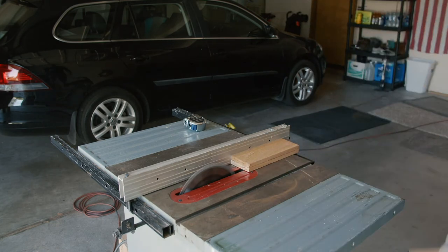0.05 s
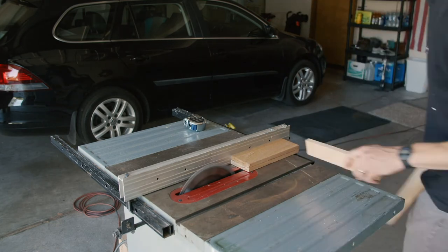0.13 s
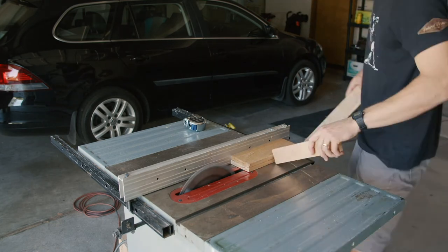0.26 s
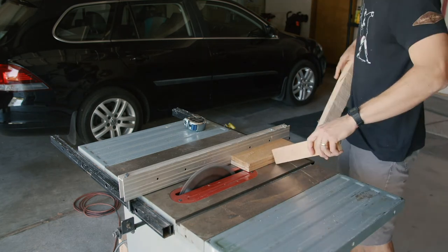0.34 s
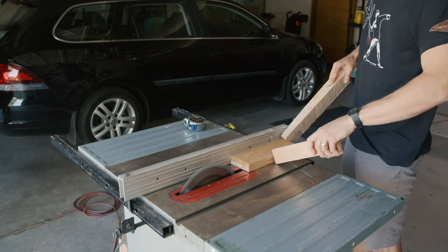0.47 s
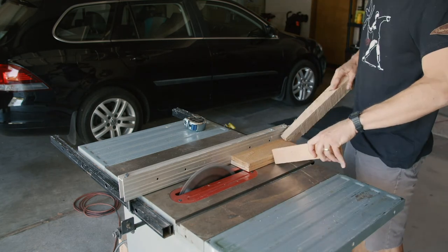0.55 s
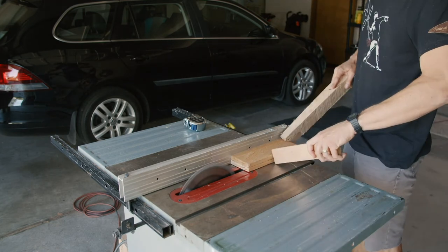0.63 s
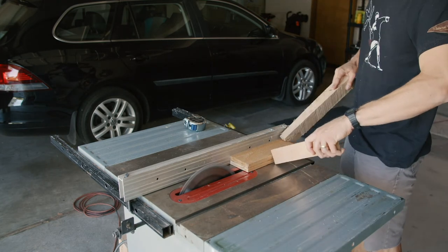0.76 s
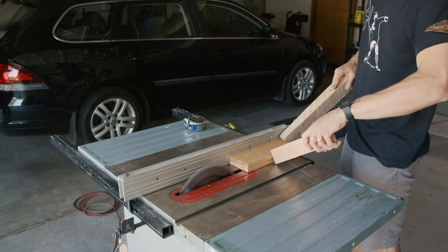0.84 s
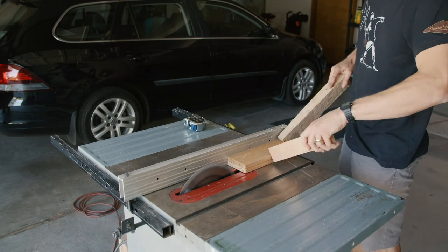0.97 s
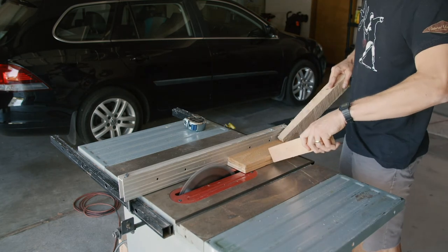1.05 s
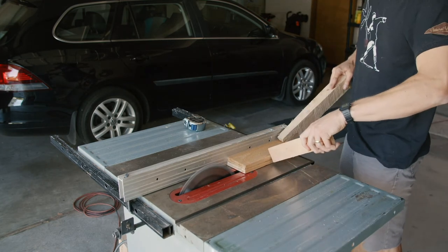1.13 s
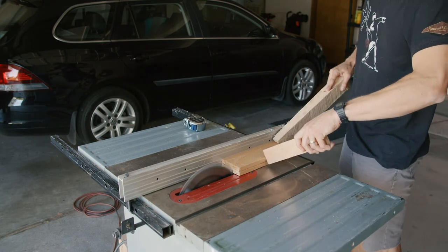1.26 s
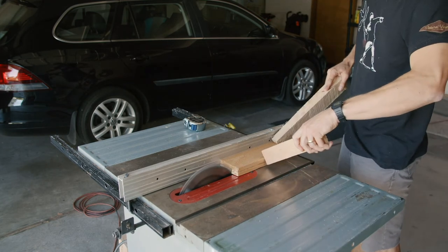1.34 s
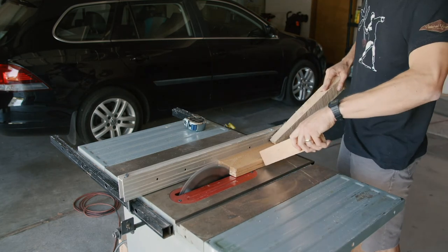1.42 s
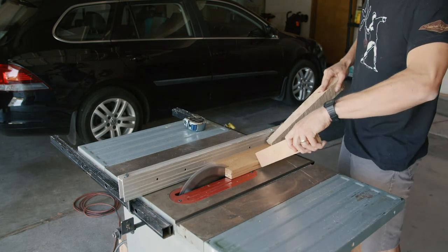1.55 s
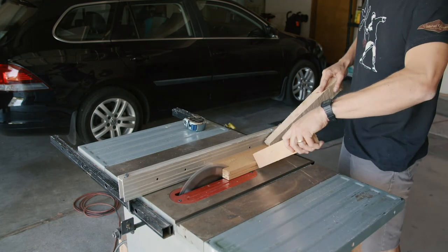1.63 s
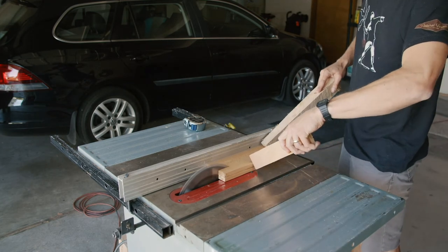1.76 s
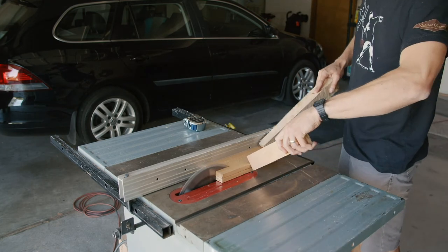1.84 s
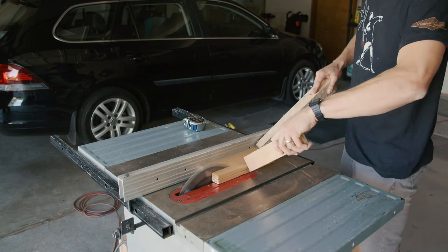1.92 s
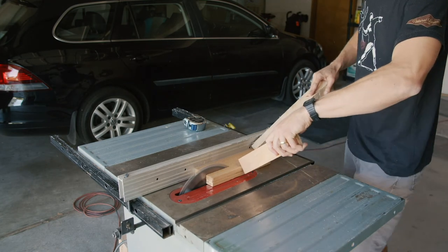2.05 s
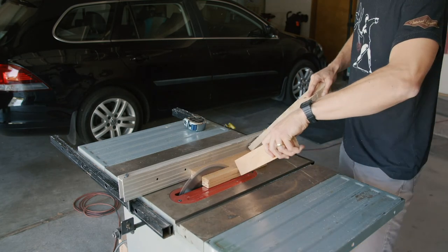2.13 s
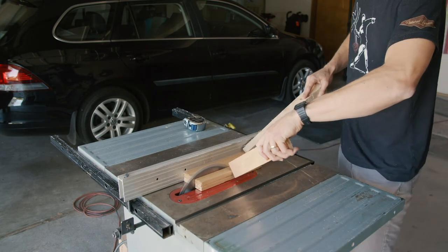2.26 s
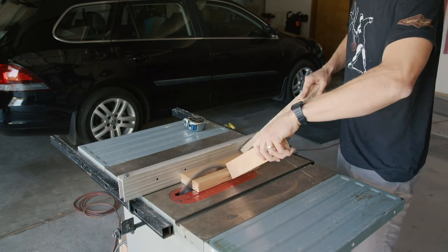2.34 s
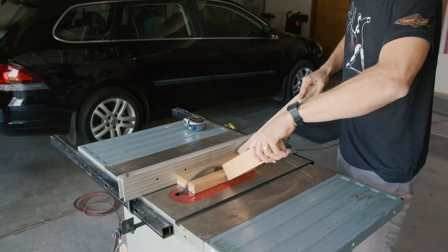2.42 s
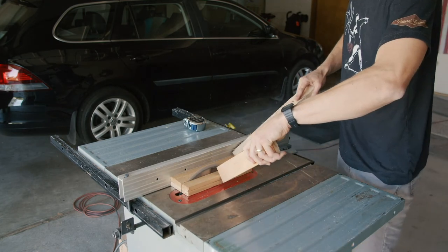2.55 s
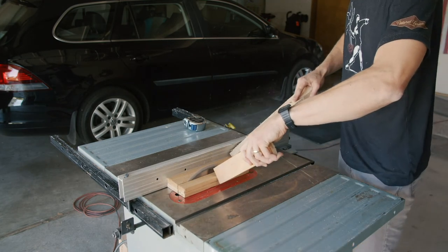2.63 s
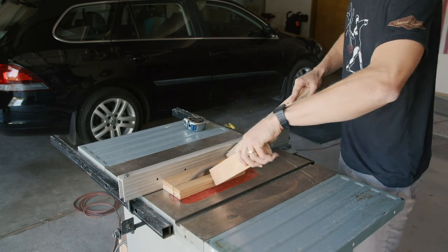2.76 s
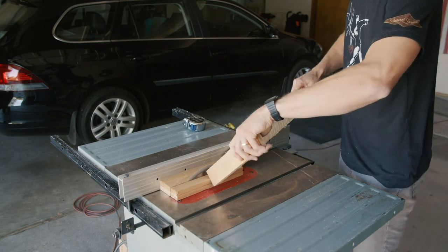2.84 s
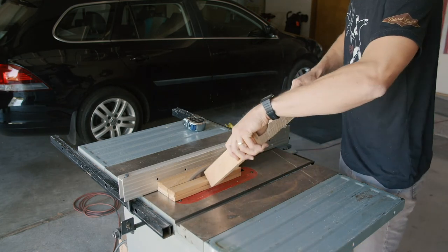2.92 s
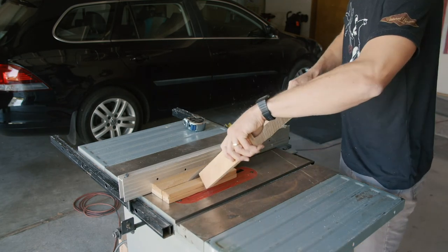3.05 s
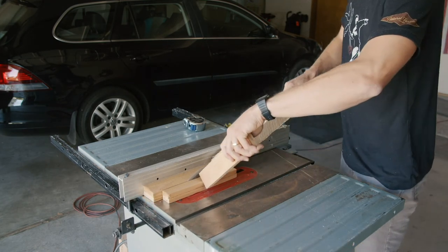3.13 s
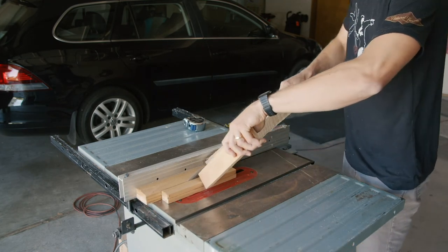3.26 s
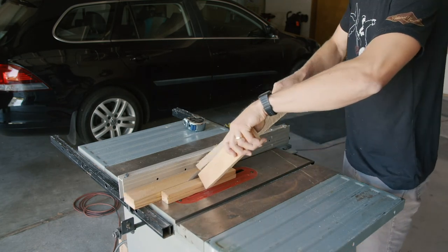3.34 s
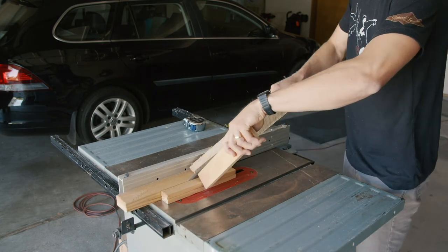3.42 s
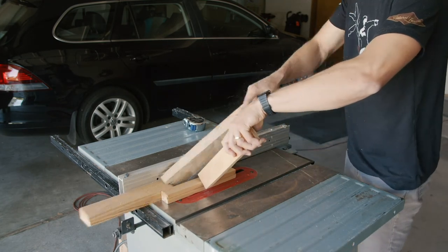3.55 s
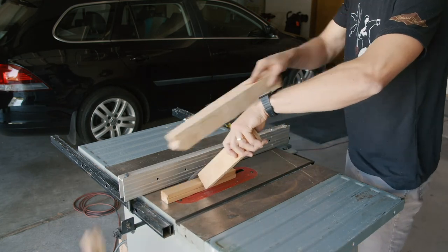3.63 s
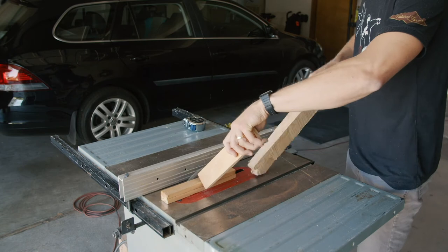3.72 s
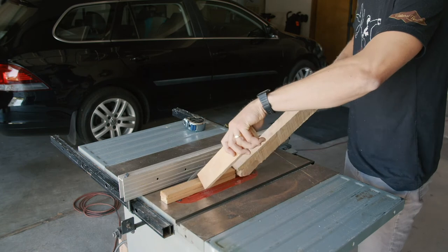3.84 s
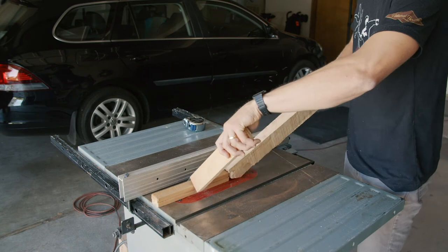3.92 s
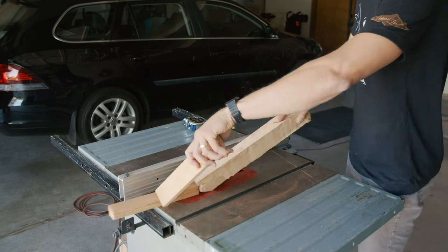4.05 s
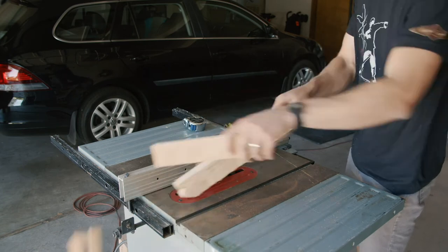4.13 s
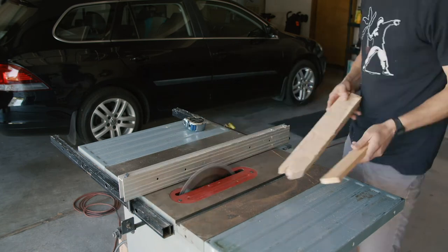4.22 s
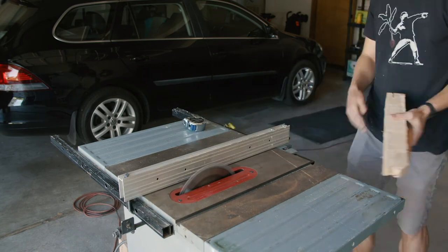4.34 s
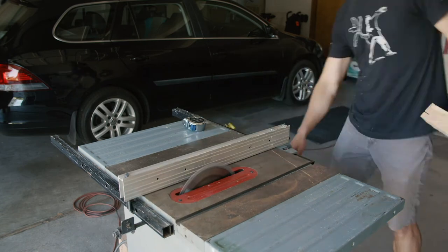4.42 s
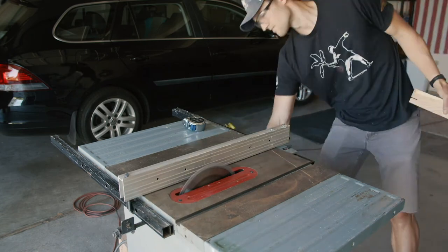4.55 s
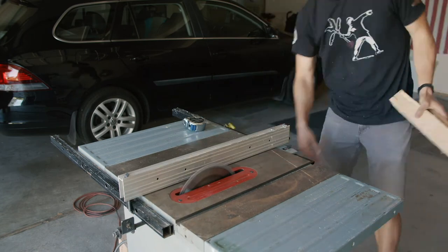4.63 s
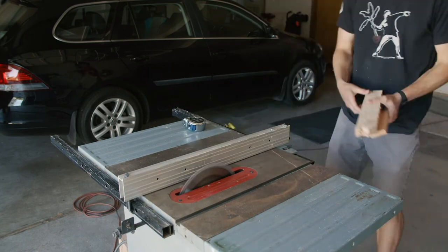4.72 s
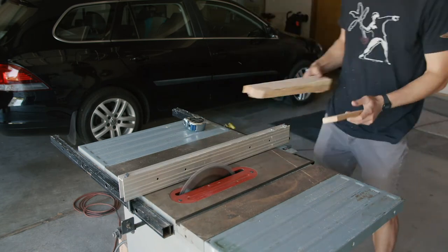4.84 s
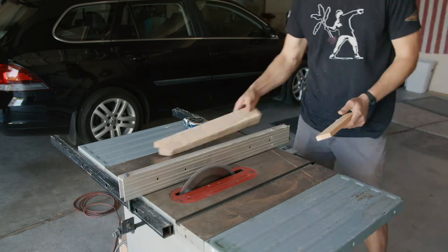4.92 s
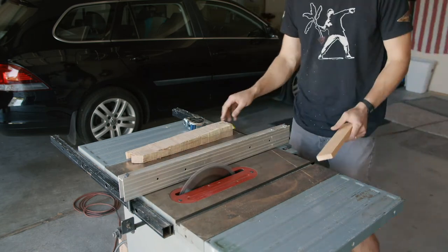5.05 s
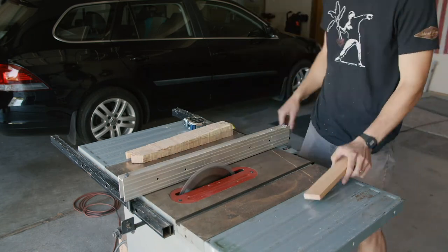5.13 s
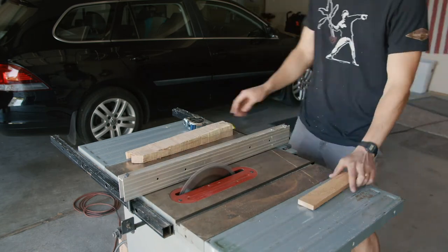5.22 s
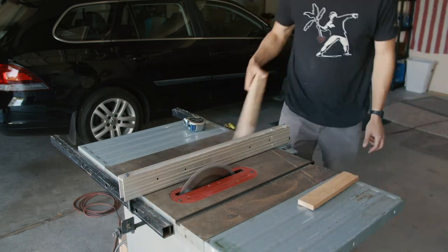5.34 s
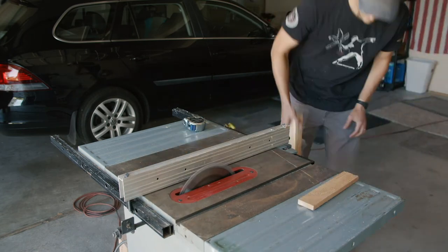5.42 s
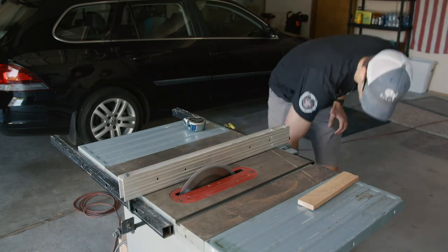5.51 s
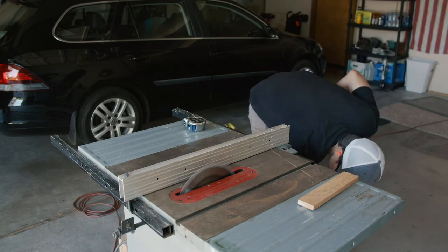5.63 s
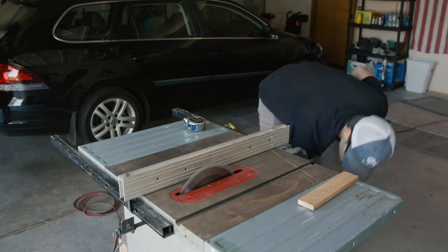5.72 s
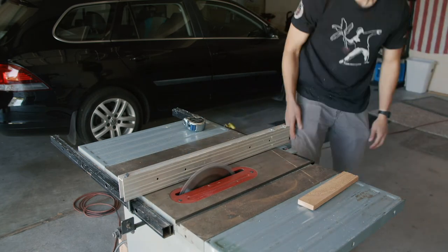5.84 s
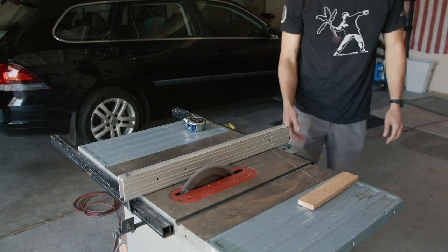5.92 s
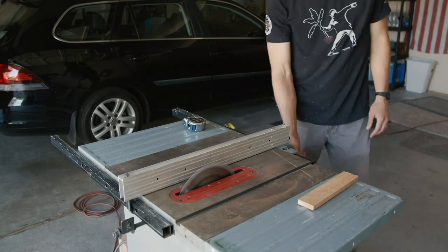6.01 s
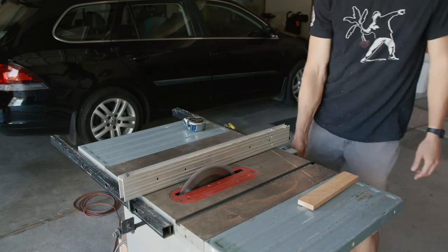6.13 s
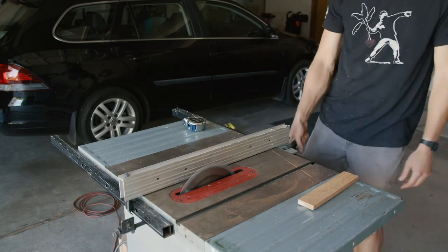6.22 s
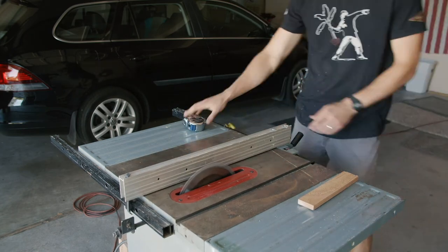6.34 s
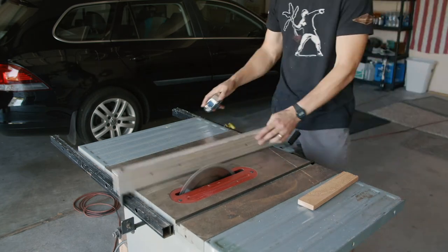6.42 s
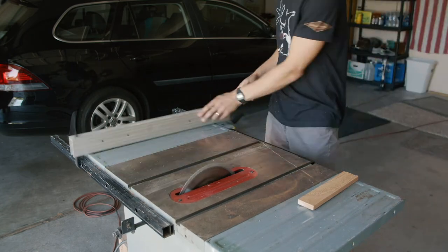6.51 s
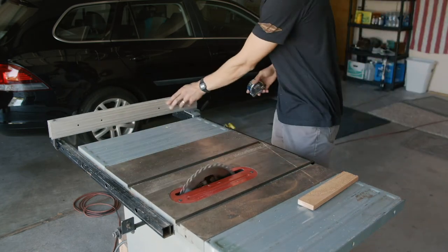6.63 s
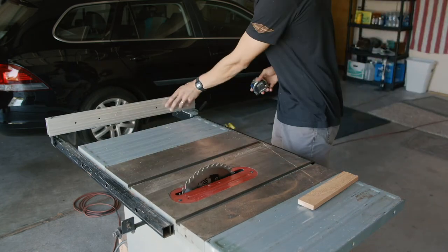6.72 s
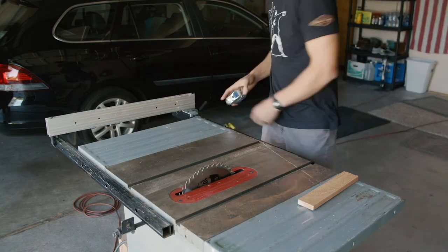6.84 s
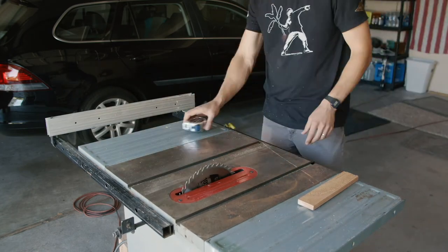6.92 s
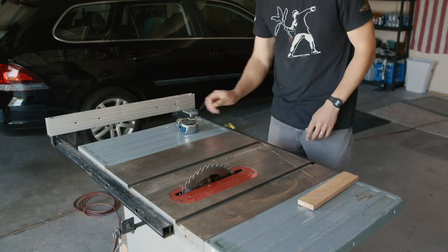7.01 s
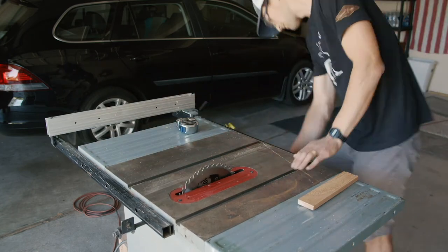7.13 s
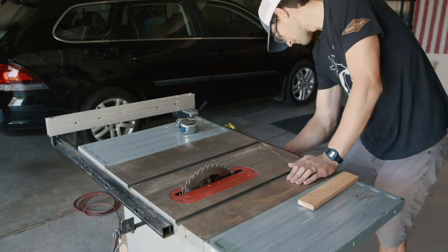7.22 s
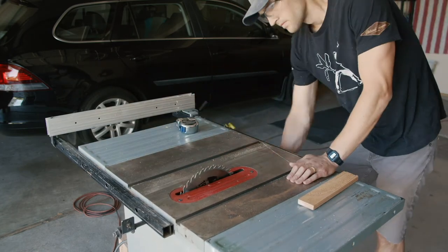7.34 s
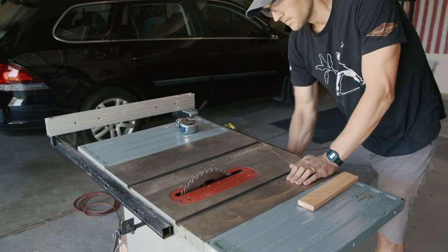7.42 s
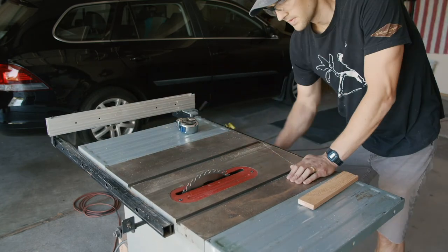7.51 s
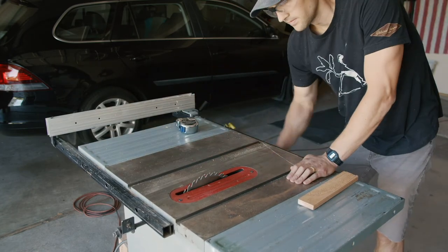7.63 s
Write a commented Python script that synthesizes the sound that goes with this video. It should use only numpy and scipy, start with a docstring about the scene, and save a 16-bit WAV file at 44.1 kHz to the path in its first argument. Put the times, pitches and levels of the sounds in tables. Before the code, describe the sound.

In a garage, a small table saw runs with a bright, hissy roar and thin motor whine. As it rips a board the pitch sags and a high whistle rises, then it recovers. A couple of tiny sharp pings sound before and around switch-off. The motor coasts down, brushes ticking and chattering, while wood clacks onto the table and tools click. Quiet room air and faint hum remain. Single close microphone, louder on the left.

```python
"""Garage: a small table saw idles, sags in speed ripping a board, is switched off and coasts down.
Brushes tick over the commutator bars and ring the motor case; shaft orders sing through the housing.
Fan and blade are shaped noise; chips ping the blade; wood and tools knock, slide and thud on the table.
Room air and a faint hum lie beneath. One microphone, fed louder to the left channel."""
import sys
import numpy as np
from scipy import signal
from scipy.io import wavfile
from scipy.ndimage import uniform_filter1d

SR = 44100
rng = np.random.default_rng(int(sys.argv[2]) if len(sys.argv) > 2 else 0)


def master_out(mix):
    """Clip the mix to full scale and print it as 16-bit PCM to the path in sys.argv[1]."""
    frames = np.transpose(np.atleast_2d(mix))
    ceiling = np.clip(frames, -1, 1)
    pcm = np.round(ceiling * 32767).astype(np.int16)
    wavfile.write(sys.argv[1], SR, pcm)


N = 338243

# garage air spectrum: f/Hz, relative level per Hz/dB
ROOM_SPECTRUM = [(25, -34), (60, -32), (100, -14.5), (200, -11), (360, -2.5), (600, -8.5), (900, -10.5),
                 (1300, -7.5), (2530, -17), (4000, -20.5), (6500, -29.5), (11000, -34.5), (13000, -36.5),
                 (16500, -46.5)]
# steady hum nearby: f/Hz, mean level/dB
HUM_TONES = [(285.3, -86.5), (576.0, -81.5), (861.3, -79)]
# low soft thuds: t/s, level/dB, f/Hz, t60/s
THUMP_EVENTS = [(3.828, -65, 64, 0.23), (4.331, -65, 68, 0.31)]
# things slid over the table: start/s, length/s, level/dB, centre f/Hz
SLIDE_EVENTS = [(5.396, 0.39, -55.5, 12100), (5.661, 0.09, -58.5, 1460), (6.498, 0.13, -60, 8040),
                (6.51, 0.15, -65, 560), (6.604, 0.15, -76, 9000), (7.199, 0.064, -79, 5000),
                (7.487, 0.19, -83, 8000)]
# clicks and knocks: t/s, level/dB, body below 3 kHz/dB, top above 9 kHz/dB
KNOCK_EVENTS = [(5.1019, -28, -8.5, -19), (5.1144, -33, -7, -7), (5.6594, -44, -17, -5),
                (5.6897, -37, -6, -11), (5.7608, -25.5, -10, -7), (5.79, -34, -12, -9),
                (6.2974, -48, -5, -1), (6.331, -39, -4, -1), (6.4293, -53, -14, -14),
                (6.5026, -47.5, -1, -1.5), (6.546, -44, -8, -20), (6.6653, -60, 11, 0),
                (6.7213, -46, 1.5, 4), (6.7316, -41, -5, -1.5), (7.011, -66.5, 6, 5),
                (7.0412, -39, -11.5, -6.5), (7.2789, -66, -5, -20), (7.3317, -62.5, -12, -19),
                (7.4969, -67, 3, -3), (7.514, -61.5, -5, -3), (7.5884, -69, -1, -1)]
# table modes rung by knocks: f/Hz, mean level/dB, t60/s
TABLE_MODES = [(540, -12.5, .06), (1440, 5.5, 0.051), (1870, 1, 0.037), (3590, -9, 0.038),
               (4550, -2, 0.034), (5140, -20, 0.052), (5740, -23, .06), (6600, -8, .04), (8500, -9, 0.037)]
# chips flung against the blade: t/s, level/dB, f/Hz, t60/s
PING_EVENTS = [(2.58, -42, 12500, .02), (3.761, -28.5, 10800, 0.034), (3.7605, -30, 14000, .015),
               (3.7615, -44, 4130, .08), (4.2567, -32, 14200, 0.016), (4.2614, -27, 14000, 0.025)]
# fan and blade hiss spectrum: f/Hz, relative level per Hz/dB
HISS_SPECTRUM = [(25, -23), (100, -29.5), (200, -40), (300, -47), (450, -13.5), (600, -13.5), (960, -15.5),
                 (1300, -10), (1700, -9.5), (2400, -8), (3320, -11), (4300, -8), (5600, -4.5), (9000, -2.5),
                 (14200, -0.5), (16500, 0)]
# ringing of guard and blade, over the hiss: f/Hz, width/Hz, level/dB
HISS_MODES = [(1263, 36, 5.5), (1714, 29, 10.5), (2150, 59, 8.5), (2390, 52, 7), (2630, 47, 6),
              (3696, 130, 5), (3640, 140, -7.5), (4210, 90, 5), (4800, 270, 3), (6520, 88, 2),
              (6940, 29, 7.5), (7660, 280, 1), (8100, 80, -8.5), (9800, 80, 2), (10080, 110, 3),
              (11100, 120, -23), (12000, 80, 4), (13300, 150, 2.5), (14200, 420, 0.5), (14900, 70, 0),
              (15800, 90, -1)]
# armature speed under power, sagging under feed: t/s, speed/(turns/s)
POWERED_SPEED = [(0, 438.1), (1.3, 438), (1.42, 433), (1.65, 410.5), (1.85, 401.3), (2.3, 390.4),
                 (2.4, 383.4), (2.5, 374.8), (2.62, 375.4), (3.0, 385.9), (3.1, 391.6), (3.2, 398.9),
                 (3.3, 402.8), (3.52, 400.6), (3.6, 404.5), (3.72, 415.2), (4.0, 427.2), (4.3, 436.2),
                 (4.5, 438.1)]
# weaker orders: multiple of armature speed
ORDER_MULTIPLES = (1, 2, 3, 5, 6, 7, 8, 8.8, 9, 10.67, 12, 16, 28, 31, 35, 36, 37, 39, 41, 48)
# one row per multiple: level at idle speed off the housing modes/dB, gain per 10% sag/dB,
# change when unpowered/dB
ORDER_LEVELS = [(-71.5, -1.5, -2), (-81, 0.5, 0.5), (-81, -4, -3), (-71.5, 2, -12.5), (-74, 5, -16),
                (-80.5, -11.5, -12), (-82, 2.5, -21), (-71.5, -3, -23), (-72, 0, -24.5), (-72, 2, 5),
                (-74.5, 4.5, 3), (-67, 3.5, -19), (-61, -2, -13), (-60, 5, -24), (-62.5, 7, -25),
                (-59, 1, -24), (-66, 4, -27), (-63, -4.5, -25), (-65, 11, -24), (-49, -2, -24)]
# housing modes lifting the orders that cross them: f/Hz, width/Hz, level/dB
HOUSING_MODES = [(185, 30, 4.5), (351, 13, 18.5), (405, 25, 7.5), (746, 10.2, 22.5), (1010, 30, 2),
                 (1203, 25, 19.5), (1350, 22, 10), (1397, 79, 19.5), (2890, 105, 24), (3158, 22, 22),
                 (3600, 49, 13), (3930, 88, 10.5), (4186, 68, 16.5), (4557, 60, 14), (14000, 200, 3.5),
                 (14400, 150, 3.5), (15700, 200, 7)]
# frame response to the slot whine (order 4): f/Hz
WHINE_F_HZ = (300, 680, 745, 850, 1120, 1215, 1390, 1500, 1521, 1545, 1572, 1605, 1640, 1690, 1752)
# one per whine frequency: level under power/dB
WHINE_LEVEL_DB = (-97, -74, -70, -85, -74.5, -54, -55.5, -47, -56.5, -46.5, -48, -57.5, -58, -58, -64)
# motor case modes rung by the brushes: f/Hz, width/Hz, level/dB
CASE_MODES = [(1470, 380, -7.5), (2210, 660, -5.5), (3100, 450, -4.5), (3610, 110, 12.5), (4500, 330, 10),
              (5600, 620, -1), (7300, 1200, 1.5), (9450, 850, 4.5), (11300, 200, 11), (12100, 380, 8),
              (13750, 500, 1.5), (15500, 480, -14), (15700, 300, -11)]
# spells of harder brush chatter: centre t/s, length/s, gain on the overtones/dB
CHATTER_SPELLS = [(5.453, 0.071, 6), (5.644, .14, 4), (5.874, 0.36, 10.5), (6.268, 0.12, 11.5),
                  (6.48, 0.047, 5), (6.554, 0.064, 14)]

STEP = 64  # samples per control value
T = np.arange(N) / SR
SLOW_T = np.arange(0, N + STEP, STEP) / SR

ROOM_DB, ECHO_DB, LEFT_OVER_RIGHT_DB, BAND_LIMIT_HZ = -71.5, -7.0, 4.5, 15750
CRACK_T60_S, KNOCK_T60_S = 0.0062, 0.082
SWITCH_OFF_S = 4.609
UNPOWERED = SLOW_T > SWITCH_OFF_S
# coast drag: turns/s lost per s; times speed; times speed squared
RUBBING_TURNS_PER_S2, VISCOUS_PER_S, FAN_PER_TURN = 87.7, .4448, .001059

AIR_DB, AIR_DB_PER_DECADE = -36, 33.5  # at idle speed; per decade of speed
BRIGHT_DB_PER_OCT, DULLING_DB_PER_OCT = 0.9, 3.5
DULL_FROM_SHARE, DULL_RATE = 0.087, 0.93  # share of idle speed lost
BLADE_GEAR = 5  # armature turns per blade turn

WHINE_COAST_DB = -1
# order 20 while the teeth bite; levels at idle speed
BITE_S, BITE_RISE_S, BITE_HOLD_S, BITE_FADE_DB_PER_S = 1.27, .25, 1, 13
BITE_DB, IDLE_WHISTLE_DB, WHISTLE_DB_PER_DECADE = -52, -79, 30
BARS, EVEN_OVERTONE_DB = 40, 2.5
# tick drive: powered; unpowered at idle speed, per decade of speed; extra fall under the stop speed
TICK_POWERED_DB, TICK_COAST_DB, TICK_DB_PER_DECADE, TICK_STOP_TURNS_PER_S = -27, -40, 22, 21
GRIT_SHARE, GRIT_HZ = 0.33, 900  # coasting tick roughness, raised in chatter spells


def amp(db):
    """dB to linear amplitude."""
    return 10 ** (np.asarray(db) / 20)


def evened(x):
    """Scale to rms 1."""
    return x / np.sqrt(np.mean(x ** 2) + 1e-20)


def fine(slow):
    """Control curve at the sample rate."""
    return np.interp(T, SLOW_T, slow)


def read(points, hz):
    """Curve through (f, value) points, straight over log frequency."""
    f, value = np.transpose(points)
    return np.interp(np.log(hz + 1), np.log(f + 1), value)


def humps(modes, hz):
    """Summed power gain of a set of resonances at hz."""
    return sum(amp(2 * db) / (1 + (2 * (hz - f) / width) ** 2) for f, width, db in modes)


def bandpass(low_hz, high_hz):
    """Second-order-design Butterworth band filter."""
    return signal.butter(2, (low_hz, high_hz), "band", fs=SR, output="sos")


def wander(rate_hz):
    """Low-passed random control curve, rms 1."""
    b, a = signal.butter(2, min(rate_hz, 300), fs=SR / STEP)
    return evened(signal.lfilter(b, a, rng.standard_normal(len(SLOW_T))))


def add(mix, s, sound):
    """Add sound into mix at s seconds, cut at the end."""
    part = mix[round(s * SR):][:len(sound)]
    part += sound[:len(part)]


def noise(shape_db, patchy_db):
    """Random short-time spectra shaped by shape_db(hz, t), with drifting patches."""
    hop, size = 256, 1024
    frames = N // hop + 5
    hz = np.fft.rfftfreq(size, 1 / SR)[:, None]
    real, imag, patches = rng.standard_normal((frames, len(hz), 3)).T
    patches = evened(uniform_filter1d(uniform_filter1d(patches, 10, 0), 12, 1))
    level_db = shape_db(hz, np.arange(frames) * hop / SR) + patchy_db * patches
    spectra = (real + 1j * imag) * amp(level_db)
    return signal.istft(spectra, nperseg=size, noverlap=size - hop)[1][:N]


def tone(turns, gain, order, flutter_db):
    """Wavering sine locked to the armature, random phase; gain is rms."""
    level = fine(gain * amp(flutter_db * wander(rate_hz=8.6)))
    return level * np.sqrt(2) * np.cos(2 * np.pi * (order * turns + rng.random()))


def garage():
    """Room air as shaped noise, plus a faint wavering hum."""
    out = amp(ROOM_DB) * evened(noise(lambda hz, t: read(ROOM_SPECTRUM, hz) + 0 * t, patchy_db=2.0))
    for hz, db in HUM_TONES:
        level = fine(amp(db + 2.7 * wander(rate_hz=8.4)))
        out += level * np.sqrt(2) * np.sin(2 * np.pi * hz * T)
    return out


def echo(x):
    """Short garage tail: sparse taps of random sign, treble dying first."""
    size = 14000
    taps = rng.choice([-1., 1.], size) * (rng.random(size) < .05) * (np.arange(size) > 250)
    hz, t, spectra = signal.stft(taps, SR, nperseg=256)
    t60_s = read([(500, 0.36), (4000, 0.14), (14000, 0.06)], hz)[:, None]
    tail = signal.istft(spectra * amp(-60 * t / t60_s), SR, nperseg=256)[1]
    return signal.fftconvolve(x, tail / np.linalg.norm(tail))[:N]


def thumps():
    """Soft low pushes: decaying sines with a slow swell-in."""
    out, t = np.zeros(N), np.arange(15000) / SR
    for s, db, hz, t60_s in THUMP_EVENTS:
        swell = 2.5 * (1 - np.exp(-t / 0.022))
        add(out, s, amp(db - 60 * t / t60_s) * swell * np.sin(2 * np.pi * hz * t))
    return out


def slides():
    """Gritty rubbing: amplitude-roughened noise, two octaves wide."""
    out = np.zeros(N)
    for s, length_s, db, hz in SLIDE_EVENTS:
        size = round(length_s * SR)
        rough_db = 4.7 * evened(uniform_filter1d(rng.standard_normal(size), 150))
        grit = rng.standard_normal(size) * amp(rough_db)
        rub = signal.sosfilt(bandpass(hz / 2, min(2 * hz, SR / 2.2)), grit)
        add(out, s, amp(db) * evened(rub) * signal.windows.tukey(size, .3))
    return out


def knocks():
    """Each blow: sharp crack and noisy tail in three bands, plus ringing table modes."""
    out, t = np.zeros(N), np.arange(9000) / SR
    bands = [bandpass(600, 900), bandpass(3000, 11700), bandpass(9000, 22000)]
    for s, db, body_db, top_db in KNOCK_EVENTS:
        decay = amp(-60 * t / CRACK_T60_S) + 0.56 * amp(-60 * t / KNOCK_T60_S)
        burst = rng.standard_normal(len(t)) * decay
        low, mid, top = (signal.sosfilt(band, burst) for band in bands)
        ring = np.zeros(len(t))
        for hz, mode_db, t60_s in TABLE_MODES:
            start_db = mode_db + 4.1 * rng.standard_normal() + body_db * (hz < 3000)
            ring += amp(start_db - 60 * t / t60_s) * np.sin(2 * np.pi * hz * t)
        blow = 1.4 * amp(body_db) * low + 0.9 * mid + 2.2 * amp(top_db) * top + 0.18 * ring
        add(out, s + .001, amp(db) * blow)
    return out


def pings():
    """Chip strikes on the blade: short decaying sines."""
    out, t = np.zeros(N), np.arange(3000) / SR
    for s, db, hz, t60_s in PING_EVENTS:
        add(out, s, amp(db - 60 * t / t60_s) * np.sin(2 * np.pi * hz * t))
    return out


def armature():
    """Speed in turns/s: set under power, then slowed by bearing, brush and fan drag, floored at 1."""
    t, turns_per_s = np.transpose(POWERED_SPEED)
    speed = np.interp(SLOW_T, t, turns_per_s)
    for k in np.flatnonzero(UNPOWERED):
        v = speed[k - 1]
        drag = RUBBING_TURNS_PER_S2 + VISCOUS_PER_S * v + FAN_PER_TURN * v ** 2
        speed[k] = max(v - drag * STEP / SR, 1)
    return speed


def air(speed, turns):
    """Fan and blade hiss: dulls and drops as the fan slows, throbs faintly per blade turn."""
    share = speed / speed[0]
    lost = np.maximum(1 - share - DULL_FROM_SHARE, 0)
    tilt_db = BRIGHT_DB_PER_OCT - DULLING_DB_PER_OCT * np.tanh(DULL_RATE * lost)

    def shape_db(hz, t):
        ringing_db = 10 * np.log10(1 + 1.13 * humps(HISS_MODES, hz))
        octaves = np.log2(hz / 6000 + 0.016)  # offset keeps 0 Hz finite
        return read(HISS_SPECTRUM, hz) + ringing_db + np.interp(t, SLOW_T, tilt_db) * octaves

    hiss = noise(shape_db, patchy_db=1.5)
    level = np.sqrt(uniform_filter1d(hiss ** 2, 8000))
    throb_db = 0.17 * np.cos(2 * np.pi * turns / BLADE_GEAR) + fine(.5 * wander(rate_hz=53))
    speed_db = fine(AIR_DB + AIR_DB_PER_DECADE * np.log10(share))
    return hiss / level * amp(speed_db + throb_db)


def whine_level(speed):
    """Slot whine/dB: the frame's response at order 4."""
    return np.interp(4 * speed, WHINE_F_HZ, WHINE_LEVEL_DB) + WHINE_COAST_DB * UNPOWERED


def whistle_level(speed):
    """Order 20/dB: rises as the teeth bite, holds, fades; falls with speed."""
    bite = np.clip((SLOW_T - BITE_S) / BITE_RISE_S, 0, 1)
    fade_s = np.maximum(SLOW_T - BITE_S - BITE_RISE_S - BITE_HOLD_S, 0)
    lift_db = np.maximum(BITE_DB - IDLE_WHISTLE_DB - BITE_FADE_DB_PER_S * fade_s, 0)
    return IDLE_WHISTLE_DB + bite * lift_db + WHISTLE_DB_PER_DECADE * np.log10(speed / speed[0])


def tick_level(speed):
    """Brush drive/dB: steady under power, falling with speed when coasting."""
    stopping_db = 40 * np.log10(np.minimum(speed / TICK_STOP_TURNS_PER_S, 1))
    coast_db = TICK_COAST_DB + TICK_DB_PER_DECADE * np.log10(speed / speed[0]) + stopping_db
    return np.where(UNPOWERED, coast_db, TICK_POWERED_DB)


def orders(speed, turns):
    """Whine, whistle and weak orders; the weak ones shift with load, fade with speed, swell on modes."""
    share = speed / speed[0]
    sag = 10 * (1 - share) * (SLOW_T < SWITCH_OFF_S)  # units of 10%
    out = tone(turns, amp(whine_level(speed)), order=4, flutter_db=2.6)
    out += tone(turns, amp(whistle_level(speed)), order=20, flutter_db=1.0)
    for multiple, (db, sag_db, coast_db) in zip(ORDER_MULTIPLES, ORDER_LEVELS):
        hz = multiple * speed
        gain = amp(db + sag_db * sag + coast_db * UNPOWERED) * share ** 1.69
        gain = gain * np.sqrt(1 + humps(HOUSING_MODES, hz)) * (hz < SR / 2)
        out += tone(turns, gain, order=multiple, flutter_db=1.5 if multiple == 1 else 3)
    return out


def brushes(speed, turns):
    """One tick per bar rings the case; unpowered brushes chatter: ticks stray and swell once a turn."""
    chatter = fine(np.where(SLOW_T < SWITCH_OFF_S, .15, 1))
    stray = .065 * fine(wander(rate_hz=280)) + .09 * np.sin(2 * np.pi * turns + .7)
    bar = BARS * turns + chatter * stray
    spell_db = sum(db * np.exp(-(2 * (SLOW_T - s) / length_s) ** 2)
                   for s, length_s, db in CHATTER_SPELLS)
    spell = amp(spell_db)
    ticks = np.zeros(N)
    for k in range(1, 13):
        # overtones join as the tick rate sinks under the top of the band
        in_band = np.clip((19000 - k * BARS * speed) / 2000, 0, 1)
        gain = in_band / k ** 1.22 * (spell if k > 1 else 1) * amp(EVEN_OVERTONE_DB * (k % 2 == 0))
        ticks += fine(gain) * np.cos(2 * np.pi * k * bar)
    # uneven tick strength smears each overtone
    b, a = signal.butter(1, GRIT_HZ, fs=SR)
    grit = evened(signal.lfilter(b, a, rng.standard_normal(N)))
    ticks = ticks * (1 + GRIT_SHARE * fine(UNPOWERED * np.sqrt(spell)) * grit)
    swell_db = 3.5 * np.cos(2 * np.pi * turns + 4.1) + fine(1.9 * wander(rate_hz=140))
    drive = ticks * amp(fine(tick_level(speed)) + chatter * swell_db)
    out = np.zeros(N)
    for k, (hz, width_hz, db) in enumerate(CASE_MODES):
        b, a = signal.iirpeak(hz, hz / width_hz, SR)
        out += (-1) ** k * amp(db) * signal.lfilter(b, a, drive)  # alternating polarity
    return out


def scene():
    """Sum all sources, same in both channels; only the small near sources get the echo."""
    speed = armature()
    turns = np.cumsum(fine(speed)) / SR
    near = slides() + knocks() + pings() + brushes(speed, turns)
    # small things radiate no bass
    near = signal.sosfilt(signal.butter(4, 380, "high", fs=SR, output="sos"), near)
    mix = garage() + thumps() + air(speed, turns) + orders(speed, turns)
    mix += near + amp(ECHO_DB) * echo(near)
    return np.array([mix, mix])


def record(dry):
    """Feed left louder than right, then limit the band."""
    balance = amp([[LEFT_OVER_RIGHT_DB / 2], [-LEFT_OVER_RIGHT_DB / 2]])
    lowpass = signal.firwin(1023, BAND_LIMIT_HZ, window=("kaiser", 9), fs=SR)
    return signal.oaconvolve(dry * balance / balance.mean(), lowpass[None], "same")


dry = scene()
out = record(dry)
master_out(out)
```